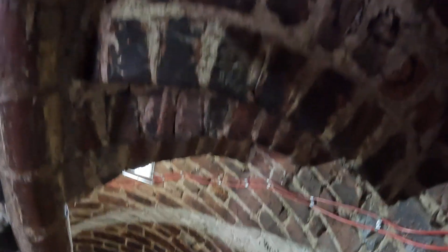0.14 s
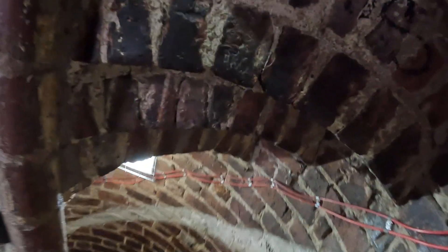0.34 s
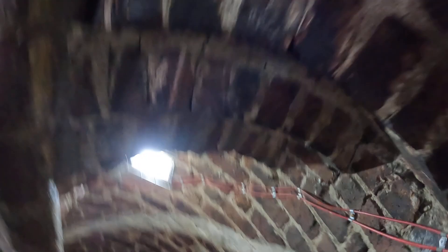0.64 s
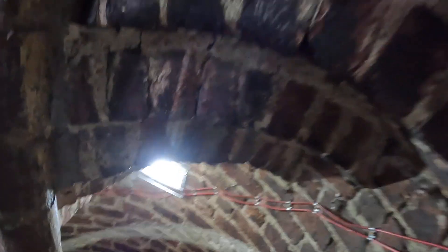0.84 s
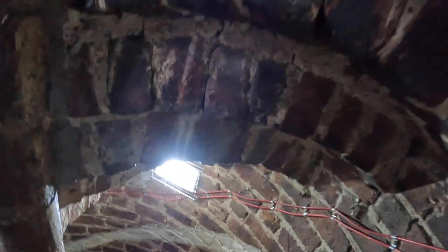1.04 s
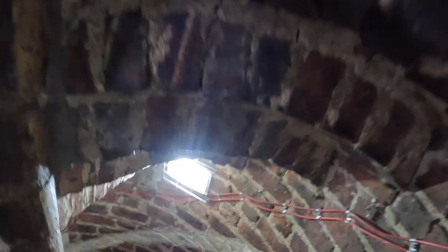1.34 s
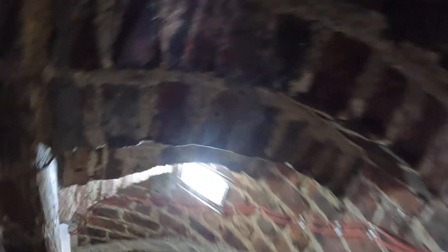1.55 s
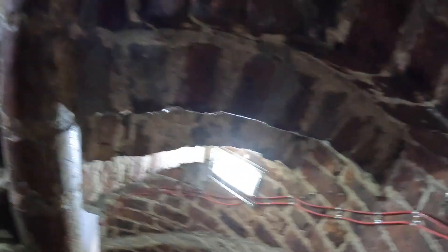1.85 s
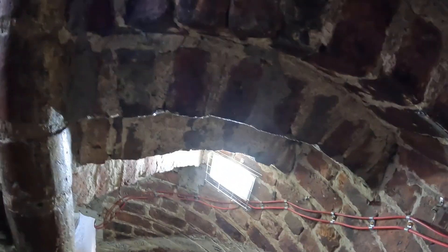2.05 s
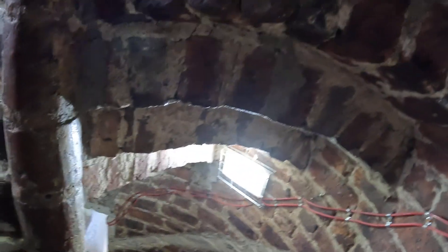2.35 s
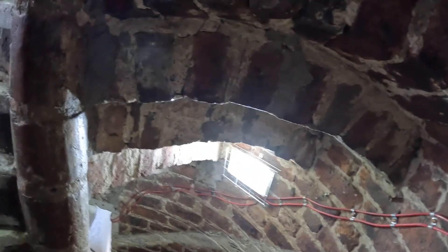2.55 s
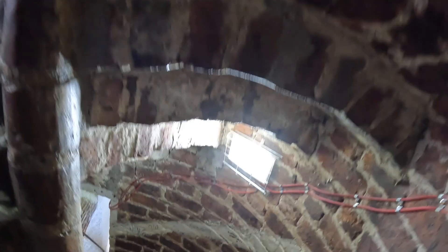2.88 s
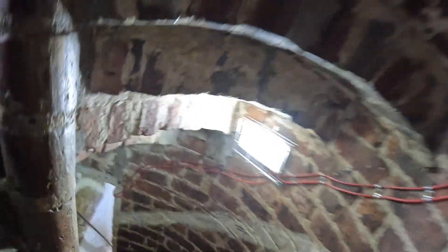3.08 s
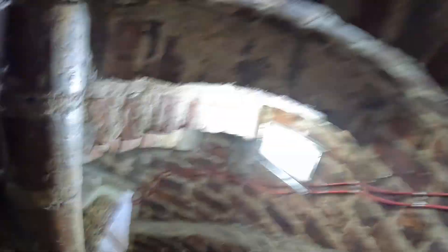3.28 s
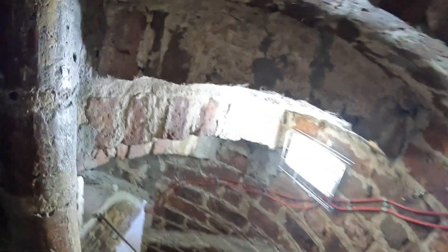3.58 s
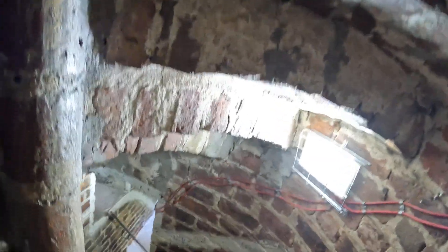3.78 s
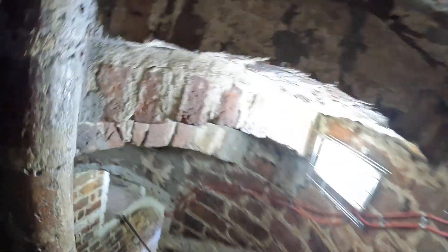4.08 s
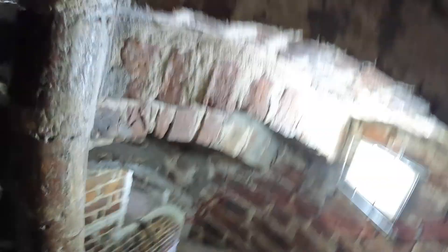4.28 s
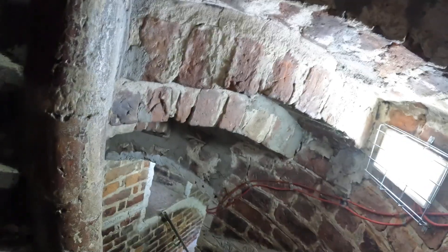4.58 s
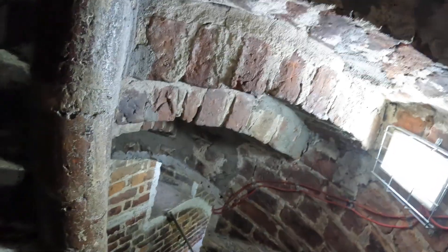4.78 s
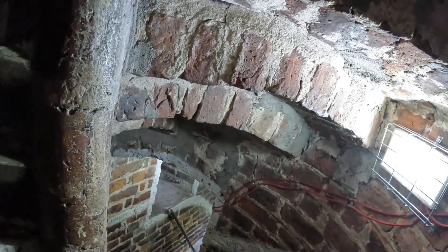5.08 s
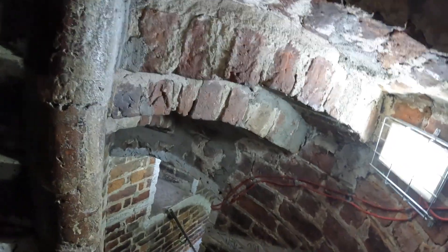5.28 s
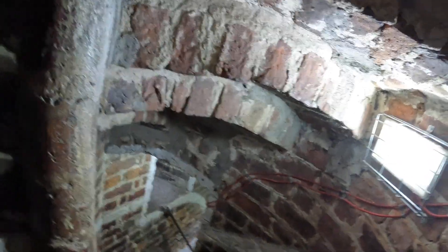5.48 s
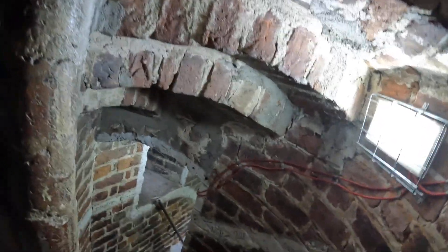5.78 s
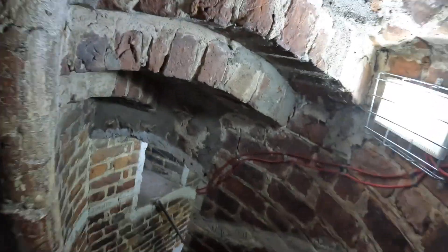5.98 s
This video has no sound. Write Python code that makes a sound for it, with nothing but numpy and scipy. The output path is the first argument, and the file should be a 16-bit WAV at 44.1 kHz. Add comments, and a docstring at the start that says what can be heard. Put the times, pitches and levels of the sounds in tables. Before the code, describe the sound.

Five spaced footfalls sound on hard, sandy treads, the first soft to firm within the opening second, the last right at the end. They knock hollowly and boom briefly between close masonry walls. Cloth swishes before and around the steps, small taps and faint ticks fill the gaps, and a dull airy rumble continues. Close handheld perspective with a short, dense reverberation.

```python
"""A narrow brick stairwell, where someone takes slow steps.
Each foot lands with a sharp slap, a hollow knock and a deep thud; noise shaped by decays and resonances
makes the contacts and the boxy echo from the close walls. The sole scuffs over grit, made of rough noise and crackle.
A jacket rustles and swishes as filtered noise, feet shuffle and tick between steps,
and a low rumble and a drone of wavering noise fill the shaft."""
import sys
import numpy as np
from scipy import signal
from scipy.fft import rfft, irfft, next_fast_len
from scipy.io import wavfile
from scipy.ndimage import uniform_filter1d, map_coordinates

SR = 44100
rng = np.random.default_rng(int(sys.argv[2]) if len(sys.argv) > 2 else 0)


def generate_wav(signal):
    """Clip the signal to [-1, 1] and save it as 16-bit WAV at the path in sys.argv[1]."""
    frames = np.transpose(np.atleast_2d(signal))
    scaled = np.clip(frames, -1, 1) * 32767
    pcm = np.round(scaled).astype(np.int16)
    wavfile.write(sys.argv[1], SR, pcm)


N = 270333
TIME = np.arange(N) / SR  # seconds since the scene began
AGE = np.arange(SR * 3 // 4) / SR  # seconds since one contact began

# boxy resonances between the walls: (f/Hz, width/Hz, height/dB)
BOX_MODES = [(335, 10.4, 5), (475, 47, 6.5), (592, 17, 5.5), (1014, 71, 6.5), (1140, 100, 1.5)]
# tone of grit and tiny clicks: (f/Hz, relative level per Hz/dB)
GRIT_TONE = [(600, 2), (2000, -3.5), (4000, 1), (7300, 0), (8400, -6.5), (12800, -10), (14200, -29),
             (16000, -24)]


def amp(db):
    """Turn decibels into a gain."""
    return 10 ** (np.asarray(db) / 20)


def unit(x):
    """Scale to an rms (average strength) of 1."""
    return x / np.sqrt(np.mean(x ** 2) + 1e-20)


def along(points, hz):
    """Read a curve of (Hz, value) points on a log frequency axis."""
    f, v = np.transpose(points)
    return np.interp(np.log(hz + 1), np.log(f), v)


def fade(t60):
    """An exponential decay that falls by 60 dB in t60 seconds."""
    return np.exp(-np.log(1000) * AGE / t60)


def add(track, s, sound):
    """Mix a sound into a track at time s, in seconds."""
    part = track[..., round(s * SR):][..., :len(AGE)]
    part += sound[..., :part.shape[-1]]


def colour(x, level):
    """Filter with a gain of level(hz) in dB, without sounding ahead of its input."""
    n = x.shape[-1]
    m = 2 * next_fast_len(n // 2 + SR // 8)  # room for the filter to ring out
    log_gain = np.log(amp(level(np.fft.rfftfreq(m, 1 / SR))))
    # folding the cepstrum forward in time gives a minimum-phase filter
    cepstrum = irfft(log_gain, m)
    cepstrum[..., 1:m // 2] *= 2
    cepstrum[..., m // 2 + 1:] = 0
    return irfft(rfft(x, m) * np.exp(rfft(cepstrum)), m)[..., :n]


def shaped(x, spectrum, peaks=()):
    """Give a mid and side pair a spectrum and resonant (Hz, width Hz, dB) peaks, at rms 1."""
    def level(hz):
        resonances = sum(db / (1 + (2 * (hz - c) / w) ** 2) for c, w, db in peaks)
        return along(spectrum, hz) + resonances
    return unit(colour(x, level))


def wobble(rate):
    """A smooth random curve, with rate random points a second."""
    knots = rng.standard_normal(int(N * rate / SR) + 4)
    return map_coordinates(knots, [TIME * rate])


def wavering_noise(rate, rough_db):
    """Mid and side noise whose level wavers at random, with rate random points a second."""
    return rng.standard_normal((2, N)) * amp(rough_db * wobble(rate))


def movement():
    """The walker's movement as one gain per sample."""
    # how much the walker moves: (t/s, level/dB)
    activity = [(0.03, -59), (0.3, -60), (0.9, -58), (1.15, -58.8), (1.55, -55.5), (1.98, -60.5),
                (2.65, -59.5), (3.1, -56), (3.6, -55.5), (3.95, -60.5), (4.2, -55), (4.7, -60.5),
                (4.88, -66.5), (5.15, -67.5), (5.6, -57.5), (5.95, -54.5)]
    return amp(np.interp(TIME, *np.transpose(activity)))


def shaft_air():
    """A low rumble follows the movement and swells briefly at times; air drones in the shaft's lowest modes."""
    # swells of the rumble: (t/s, level/dB, half length/s, where the swell's power is down to 1/e)
    swells = [(0.11, -30.5, 0.042), (0.676, -28.5, 0.076), (1.6, -31.5, .14), (3.292, -30, 0.081),
              (4.33, -29.5, 0.09), (6.12, -25, 0.057)]
    # tone of the rumble: (f/Hz, relative level per Hz/dB)
    rumble_tone = [(10, 3), (25, 4), (45, 0), (65, -9.5), (100, -13), (300, -62.5), (1000, -120)]
    # tone of the drone: (f/Hz, relative level per Hz/dB)
    drone_tone = [(45, -10), (80, -4), (105, -5), (120, 6), (140, 0), (158, -0.5), (200, -8), (270, -17),
                  (480, -16), (750, -35.5), (2000, -62), (8000, -120)]
    # loudness of the drone: (t/s, level before the drone gain/dB)
    drone_level = [(0.0, -51), (0.46, -50), (0.78, -49), (1.53, -51.5), (1.78, -46.5), (3.98, -50.5),
                   (4.34, -49), (4.83, -54), (6.13, -48)]
    rumble_db, follows = -38.5, 0.43  # follows: dB of rumble gained for each dB of movement
    drone_gain_db = 2
    steady = amp(rumble_db) * unit(movement()) ** follows
    swell_power = sum(amp(db) ** 2 * np.exp(-((TIME - s) / half) ** 2) for s, db, half in swells)
    rumble_level = np.sqrt(steady ** 2 + swell_power)
    rumble = rumble_level * shaped(wavering_noise(rate=4, rough_db=1), rumble_tone)
    drone_gain = amp(drone_gain_db + np.interp(TIME, *np.transpose(drone_level)))
    return rumble + drone_gain * shaped(wavering_noise(rate=6, rough_db=1.2), drone_tone)


def patchy(x, depth_db):
    """Folds of cloth move, so that bands of the sound swell and fade in patches."""
    z = signal.stft(x, nperseg=1024)[2]
    field = rng.standard_normal(z.shape[1:])
    field = uniform_filter1d(field, size=9, axis=0)  # smooth across frequency
    field = uniform_filter1d(field, size=9, axis=1)  # smooth across time
    return signal.istft(z * amp(depth_db * unit(field)), nperseg=1024)[1][:, :N]


def swept(x, pitch, half_width_hz, height_db):
    """One broad resonance that follows a pitch (Hz per sample)."""
    hz, t, z = signal.stft(x, SR, nperseg=512)
    distance_hz = hz[:, None] - np.interp(t, TIME, pitch)
    bump = 1 / (1 + (distance_hz / half_width_hz) ** 2)
    return signal.istft(z * amp(height_db * bump), SR, nperseg=512)[1][:, :N]


def jacket():
    """Cloth rustles and chafes with movement; arm and leg swings swish up and die away, each pulling the pitch."""
    # cloth slides over cloth: (t at full speed/s, level/dB, rise/s, fall/s, pitch/Hz)
    # rise and fall are the times for a change by a factor e
    swings = [(0.098, -51.5, .004, 0.026, 6000), (0.66, -57.5, 0.076, 0.21, 4000),
              (1.08, -63, 0.047, .11, 2200), (1.37, -52, 0.072, 0.13, 3420),
              (1.485, -50, 0.096, 0.11, 6500), (2.21, -63, 0.02, 0.14, 5000),
              (2.85, -62, .015, 0.055, 5500), (2.96, -63, .04, 0.04, 6000), (3.22, -53, 0.065, 0.16, 4650),
              (3.45, -56.5, 0.097, 0.1, 3500), (3.83, -62.5, .08, 0.035, 5400),
              (4.07, -53, 0.057, 0.15, 6500), (4.24, -49, 0.15, 0.12, 5200), (4.95, -66.5, .015, .06, 4040),
              (5.478, -58.5, 0.21, 0.061, 5540), (5.72, -65, 0.096, 0.094, 4500)]
    # tone of the soft rustle: (f/Hz, relative level per Hz/dB)
    rustle_tone = [(200, -18.5), (450, -7), (780, -6), (1250, 2), (2000, -4), (3500, -8.5), (7000, -14),
                   (9000, -24), (16000, -51)]
    # tone of the bright chafing and swishing: (f/Hz, relative level per Hz/dB)
    swish_tone = [(900, -9), (1900, -5.5), (3500, -0.5), (7200, -2.5), (8400, -10.5), (12800, -12.5),
                  (14200, -30), (16000, -48)]
    rustle_db, chafe_db = -0.5, -6.5  # relative to the movement
    envelopes = [amp(db) * np.exp(-np.maximum((s - TIME) / rise, (TIME - s) / fall))
                 for s, db, rise, fall, hz in swings]
    power = np.array(envelopes) ** 2
    swing = np.sqrt(power.sum(axis=0))
    # the strongest swing at each moment weighs most in the pitch
    pitch = np.array([hz for *_, hz in swings]) @ power / swing ** 2
    stir = movement() * amp(2.5 * wobble(12))
    soft = shaped(patchy(wavering_noise(rate=40, rough_db=.6), depth_db=2.0), rustle_tone)
    sliding = swept(wavering_noise(rate=120, rough_db=.8), pitch, half_width_hz=690, height_db=2.0)
    bright = shaped(patchy(sliding, depth_db=2.5), swish_tone, [(1790, 340, 8.6)])
    return amp(rustle_db) * stir * soft + np.hypot(amp(chafe_db) * stir, swing) * bright


def blow(contact_t60, echo_db):
    """A brief contact, strongest in the middle, with the dense echo from the walls all round."""
    # how long the echo lasts: (f/Hz, time to fall 60 dB/s)
    echo_t60 = [(100, 1), (300, 0.5), (1000, 0.5), (4000, 0.69), (12000, 0.3)]
    hz, t, z = signal.stft(rng.standard_normal((2, len(AGE))), SR, nperseg=256)
    decay = np.exp(-np.log(1000) * t / along(echo_t60, hz)[:, None])
    tail = signal.istft(z * decay, SR, nperseg=256)[1][:, :len(AGE)]
    direct = rng.standard_normal((2, len(AGE))) * fade(contact_t60) * amp([[0], [-7]])  # mid, side
    return unit(direct) + amp(echo_db) * unit(tail)


def thud():
    """Body weight sets the deep modes ringing, alike at both ears."""
    # deep modes of tread and shaft, varied a little each time: (f/Hz, level/dB, time to fall 60 dB/s)
    deep_modes = [(50.3, -6.5, 0.37), (115.7, 2, 0.28), (139.05, -9, 0.6), (191.5, -6.5, 0.18),
                  (225.7, -12, 0.13)]
    total = np.zeros(len(AGE))
    for hz, db, t60 in deep_modes:
        strength = amp(db + rng.normal(0, 3.2))
        varied_hz = hz * (1 + rng.normal(0, 0.022))
        total += strength * fade(t60) * np.sin(2 * np.pi * varied_hz * AGE)
    return unit(total * (1 - fade(0.026))) * np.array([[1], [0]])  # mid only


def shuffles():
    """A foot shifts on the tread; the longer its touch, the slower the sound rises."""
    # light taps and brushes: (t/s, level/dB, thud/dB, pitch/Hz, length/s, echo relative to contact/dB)
    taps = [(0.0, -62, -69, 402, 0.14, 0), (0.725, -61.5, -51.5, 450, 0.097, -3),
            (0.955, -87, -51, 558, 0.048, 6), (2.068, -63.5, -50, 600, 0.023, -7.5),
            (2.201, -63, -50.5, 1500, 0.061, -1), (2.31, -65.5, -53, 1300, 0.074, -2),
            (2.38, -53.5, -48.5, 885, 0.041, 2), (4.612, -67, -76, 1190, 0.044, -4),
            (5.295, -64, -58, 398, 0.072, 0), (5.381, -61.5, -56, 1000, 0.19, -8),
            (5.464, -61, -80, 2280, 0.15, -15)]
    # tone of a brushing foot: (f/Hz, relative level per Hz/dB)
    brush_tone = [(100, 11), (400, 1), (700, -6.5), (1200, -3.5), (2400, -9), (5000, -21.5), (16000, -56)]
    out = np.zeros((2, N))
    for s, db, thud_db, hz, length, echo_db in taps:
        touch = blow(length, echo_db) * (1 - fade(length / 2))
        add(out, s, amp(db) * shaped(touch, brush_tone, [(hz, hz, 6)]))
        add(out, s, amp(thud_db) * thud())
    return out


def ring(hz, t60):
    """A struck spot rings briefly at its own pitch."""
    tone = np.sin(2 * np.pi * hz * AGE) * fade(t60) * (1 - fade(0.0011))
    return unit(tone) * np.array([[1], [0]])  # mid only


def footsteps():
    """Each contact is the sharp slap of the shoe, then a hollow knock and a deep thud as the weight arrives."""
    # heel and sole contacts, with levels before the trims below:
    # (t/s, overall level/dB, thud/dB, knock/dB, slap/dB, knock pitch/Hz, slap pitch/Hz,
    #  ring relative to knock noise/dB, boom/dB)
    # thud, knock and slap are added to the overall level
    steps = [(0.095, -30, 1, -9.5, -25, 191, 2000, -24, -5),
             (0.559, -23.5, -2.5, -7.5, -7, 1050, 3850, -11, -22),
             (0.605, -17.5, -4.5, -10.5, -45, 1040, 2170, -3, -16),
             (1.67, -15.5, -5, -13.5, -17.5, 497, 3200, 0.5, -31),
             (1.697, -19.5, -3.5, -16, -39, 520, 1820, 7.5, -27),
             (1.71, -18.5, -11, -11.5, -39, 555, 2940, 2, -16),
             (1.732, -19, -6, -17, -24, 189, 1860, 10, -10),
             (3.2094, -17, -10.5, -11.5, -14, 355, 2680, -10, -12.5),
             (3.268, -22, -9.5, -7.5, -32, 475, 2210, -5, -22),
             (4.267, -13.5, -7.5, -12.5, -14, 388, 5000, -1.5, -10.5),
             (4.312, -21, -8, -9, -41, 364, 2170, -0.5, -14),
             (4.322, -17.5, -6, -13, -40, 198, 1940, 3.5, -20),
             (4.349, -20.5, -2.5, -13, -31, 212, 4130, -17, -10),
             (6.008, -14.5, -15.5, -8, -23, 228, 2060, -5, -9.5),
             (6.095, -16.5, -2, -13, -25, 222, 1850, 4, -11)]
    # tone of the hollow knock: (f/Hz, relative level per Hz/dB)
    knock_tone = [(60, -11), (200, 3), (400, -0.5), (700, -7.5), (1200, -11.5), (2000, -15), (4000, -31.5),
                  (16000, -88)]
    # tone of the sharp slap: (f/Hz, relative level per Hz/dB)
    slap_tone = [(400, -26), (1500, -3), (2600, 4.5), (3800, 3.5), (5400, -1), (7300, -8.5), (8500, -22),
                 (13000, -29), (16000, -61)]
    slap_trim_db, knock_trim_db, thud_trim_db, boom_trim_db = -22.5, -18, -16.5, 13.5
    knock_delay_s, thud_delay_s = 0.001952, 0.0025
    out = np.zeros((2, N))
    for s, db, thud_db, knock_db, slap_db, knock_hz, slap_hz, ring_db, boom_db in steps:
        # a blow near the middle of the tread booms more than one at its edge
        boom = (280, 150, boom_db + boom_trim_db)
        knock = shaped(blow(contact_t60=0.074, echo_db=-0.5), knock_tone, BOX_MODES + [boom])
        knock = knock + amp(ring_db) * ring(knock_hz, t60=0.093)
        crack = amp(-4) * unit(rng.standard_normal((2, len(AGE))) * fade(.01))
        # the heel's mode, with a dip in the tone below it
        heel = [(slap_hz, 700, 6), (0.795 * slap_hz, 450, -5)]
        slap = shaped(blow(contact_t60=0.16, echo_db=-3) + crack, slap_tone, heel)
        add(out, s, amp(db + slap_db + slap_trim_db) * slap)
        add(out, s + knock_delay_s, amp(db + knock_db + knock_trim_db) * knock)
        add(out, s + thud_delay_s, amp(db + thud_db + thud_trim_db) * thud())
    return out


def ticks():
    """Grit and clothing make tiny hard contacts, each with one short ring."""
    # small clicks: (t/s, click/dB, pitch/Hz, ring/dB)
    clicks = [(0.386, -88, 2930, -79), (2.846, -77, 3140, -96), (3.4452, -66.5, 13500, -78),
              (5.656, -71.5, 4100, -75), (5.871, -83, 2920, -70)]
    out = np.zeros((2, N))
    for s, click_db, hz, ring_db in clicks:
        click = shaped(blow(contact_t60=0.014, echo_db=3), GRIT_TONE, [(hz, 0.27 * hz, 6)])
        add(out, s, amp(click_db) * click + amp(ring_db) * ring(hz, t60=0.016))
    return out


def grains(rate, spread):
    """Mid and side crackle: about rate sand grains a second, most small and a few large."""
    hits = rng.random(N) < rate / SR
    sizes = np.exp(spread * rng.standard_normal(N))
    return unit(rng.standard_normal((2, N)) * hits * sizes)


def scuffs():
    """The sole bites, slides and lets go: it rubs the tread into its resonances and grinds sand under it."""
    # slides of the sole, with levels before the trims below:
    # (t/s, hold/s, time to fall 60 dB/s, hollow rub/dB, rasp/dB, grit/dB)
    slides = [(0.555, .008, 0.14, -56, -34, -68), (0.6, .012, 0.091, -32.5, -32, -59),
              (1.663, 0.042, 0.37, -32.5, -32.5, -45.5), (1.701, .014, 0.2, -29.5, -29.5, -59),
              (2.198, 0.014, 0.38, -50, -52.5, -66), (2.312, 0.018, 0.41, -49.5, -49, -69),
              (2.379, 0.0089, 0.24, -50, -52, -65), (3.208, 0.0088, .1, -34.5, -31, -59),
              (3.232, 0.043, 0.27, -45, -33, -43.5), (3.325, 0.03, 0.28, -38.5, -44.5, -48.5),
              (4.268, 0.0063, 0.11, -21.5, -33, -45), (4.318, 0.011, 0.15, -25, -32.5, -50),
              (4.345, 0.032, 0.26, -52, -45, -51.5), (5.292, .012, 0.96, -55, -59.5, -75),
              (6.002, 0.035, 0.25, -49, -45, -47), (6.09, .018, 0.22, -30, -34.5, -47)]
    # rise as the sole bites: one time/s each for the hollow rub, the rasp and the grit
    attack_s = [0.0065, 0.0054, 0.015]
    # tone of the hollow rub: (f/Hz, relative level per Hz/dB)
    hollow_tone = [(120, -23), (280, -20.5), (380, -12), (550, -10), (720, -15.5), (1200, -37), (4000, -64)]
    # tone of the rasp: (f/Hz, relative level per Hz/dB)
    rasp_tone = [(400, -38.5), (750, -1.5), (1000, 8), (1300, 6.5), (1700, -6.5), (2600, -13), (8000, -44)]
    hollow_trim_db, rasp_trim_db, sand_trim_db = -2.5, -4, 3.5
    gains = np.zeros((3, N))
    bite = np.minimum(AGE / np.array(attack_s)[:, None], 1)
    for s, hold, t60, *levels_db in slides:
        release = np.exp(-np.log(1000) * np.maximum(AGE - hold, 0) / t60)
        add(gains, s, amp(levels_db)[:, None] * bite * release)
    rubbing = wavering_noise(rate=180, rough_db=3)
    hollow = amp(hollow_trim_db) * shaped(rubbing, hollow_tone, BOX_MODES)
    crunching = wavering_noise(rate=250, rough_db=1) + 0.96 * grains(rate=350, spread=0.33)
    rasp = amp(rasp_trim_db) * shaped(crunching, rasp_tone, BOX_MODES)
    grinding = grains(rate=3000, spread=0.19) + 2.0 * wavering_noise(rate=300, rough_db=6.0)
    sand = amp(sand_trim_db) * shaped(grinding, GRIT_TONE)
    return gains[0] * hollow + gains[1] * rasp + gains[2] * sand


def scene():
    """Mix all sounds; the mid part is alike in both channels and the side part makes them differ."""
    # gain of the side part: (f/Hz, gain/dB)
    side_gain = [(25, -7), (70, -23.5), (150, -15.5), (500, -10), (1000, -8.5), (2000, -4.5), (5000, -7.5),
                 (12000, -5)]
    mid, side = shaft_air() + jacket() + shuffles() + footsteps() + ticks() + scuffs()
    side = colour(side, lambda hz: along(side_gain, hz))
    return np.array([mid + side, mid - side])


def record(dry):
    """Make the left channel brighter than the right, cut the highest treble and fade the last 3 ms."""
    # balance of the channels: (f/Hz, left minus right/dB)
    balance = [(60, -1), (110, 0.5), (200, 0.0), (380, 1.0), (700, 0.5), (1290, 3), (2380, 3.5),
               (4400, 1.5), (8120, 2), (15000, 9.5)]
    top_hz = 15750
    tinted = colour(dry, lambda hz: along(balance, hz) * np.array([[.5], [-.5]]))
    steep_lowpass = signal.ellip(12, .1, 90, top_hz, fs=SR, output="sos")
    ending = np.minimum((TIME[-1] - TIME) / .003, 1)
    return ending * signal.sosfilt(steep_lowpass, tinted)


dry = scene()
out = record(dry)
generate_wav(out)
```